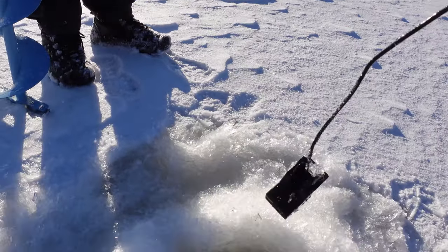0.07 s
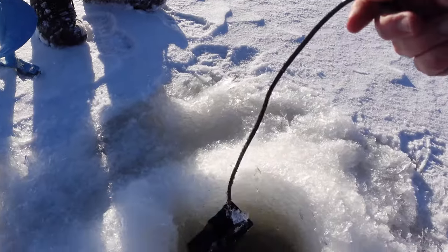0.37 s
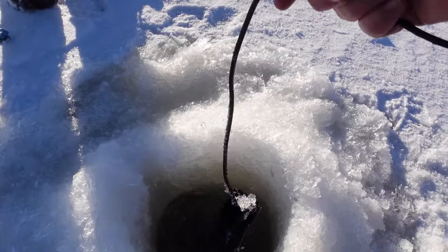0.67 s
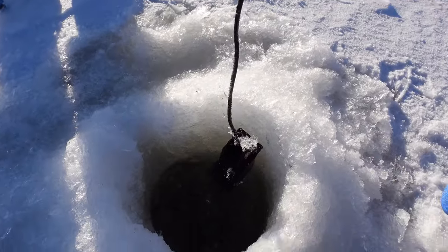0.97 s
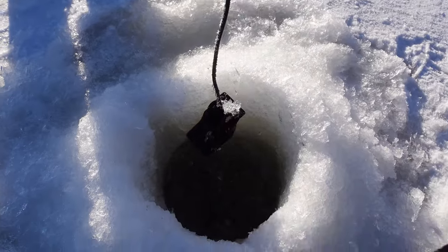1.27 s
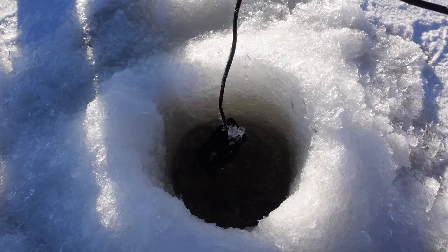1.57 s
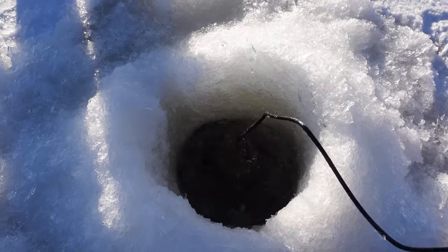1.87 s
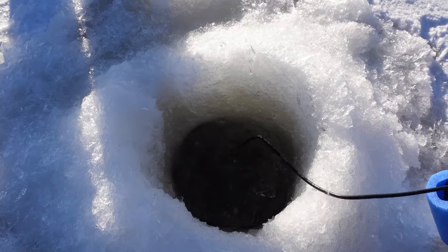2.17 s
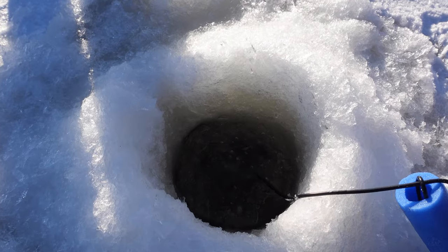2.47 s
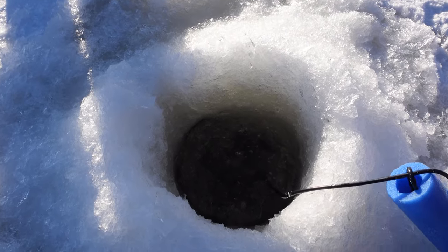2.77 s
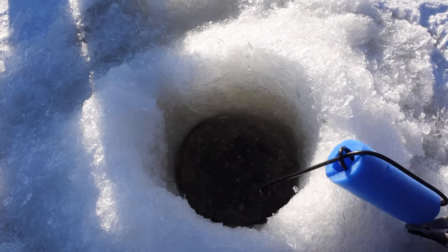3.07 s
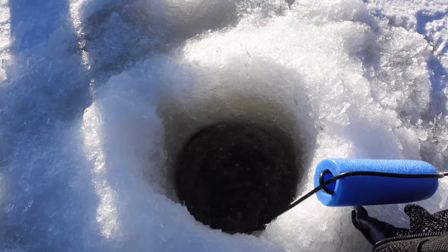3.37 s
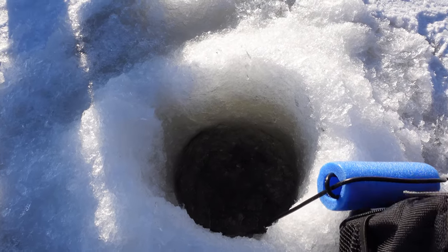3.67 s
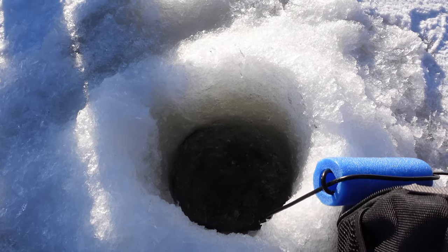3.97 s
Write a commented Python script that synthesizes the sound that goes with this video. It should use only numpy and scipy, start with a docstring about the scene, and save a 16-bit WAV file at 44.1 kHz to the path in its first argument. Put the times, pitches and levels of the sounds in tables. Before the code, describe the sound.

A brief splash with gurgling bubbles sounds as a device on a cable falls through a hole in lake ice. Soft handling comes before it; close snow crackles and jacket rustling follow, while light wind rumbles on the microphone.

```python
"""Device dropped into an ice hole

A small device on a cable is lowered into a hole in lake ice and dropped: it breaks the slush,
splashes and gulps air, which rings as bubbles. The cable rubs over the snowy rim, then winter
clothing and a foam float rustle and knock close by. Light wind buffets the microphone.
The open snowfield gives no echo; only the hole rings."""
import sys
import numpy as np
from scipy import signal
from scipy.fft import rfft, irfft
from scipy.io import wavfile
from scipy.ndimage import uniform_filter1d

SR = 44100
rng = np.random.default_rng(int(sys.argv[2]) if len(sys.argv) > 2 else 0)


def transcribe(u):
    """Save the signal u as a 16-bit wav file named by the first command-line argument.

    u: samples, shape (n,) or (channels, n), limited to [-1, 1]; the rate is SR.
    q: integer samples, one column per channel.
    """
    v = np.clip(np.atleast_2d(u).T, -1, 1)
    q = np.round(v * 32767).astype(np.int16)
    wavfile.write(sys.argv[1], SR, q)


N = 176400
T, HZ = np.arange(N) / SR, np.fft.rfftfreq(N, 1 / SR)

# Spray envelope (time [s], level [dB])
SPRAY_LEVELS = [(1.63,-51),(1.651,-23.5),(1.699,-31.5),(1.721,-15.5),(1.75,-25.5),(1.8,-17.5),(1.839,-20),(1.869,-41.5),(2.042,-47)]
# Gulped air (time [s], first pitch [Hz], last pitch [Hz], peak [dB], swell [s], decay [s])
AIR_BUBBLES = [(1.723,2890,2250,-20.5,0.0074,0.0092),(1.7451,657,940,-4.5,0.00066,0.0019),(1.7461,1520,2010,-2,0.001,0.0016),(1.753,512,668,-12,0.0027,0.0091),(1.755,1905,1703,-14,0.0014,0.0203),(1.79,4190,4320,-11.5,0.0013,0.0052),(1.789,1683,1707,-10.5,0.0023,0.017),(1.809,1960,1712,-7,0.0011,0.0096),(1.836,990,1160,-4.5,0.00084,0.0015),(1.8395,604,910,-11,0.0011,0.0059),(1.85,471,550,-11.5,0.0049,0.006),(1.854,1630,2310,-12.5,0.0016,0.0071),(1.8646,1135,1380,-12,0.00091,0.0066),(1.949,1070,1730,-24.5,0.0016,0.0081),(1.963,1640,1920,-35,.004,0.0135),(2.121,834,2750,-25.5,0.012,0.0021)]
# Small bubbles (start [s], end [s], lowest pitch [Hz], highest pitch [Hz], max peak over spray [dB])
SWARMS = [(1.722,1.844,1363,2700,10),(1.874,1.989,890,2020,11)]
# Drips after the splash (time [s], pitch [Hz], peak [dB])
LATE_DRIPS = [(1.906,5840,-25.5),(1.979,7400,-25),(1.9842,4070,-23.5),(2.1146,7250,-22),(2.2387,6300,-13)]
# Slush, crust and plastic snapping (time [s], level [dB], centre [Hz])
SNAP_HITS = [(1.3451,-25.5,2080),(1.652,-13,7400),(1.665,-14,11000),(1.704,-14,13200),(1.7163,-12,6000),(1.8275,-13,4200),(2.491,-10.5,4800),(2.547,-10.5,6500),(2.5919,-7,2710),(2.596,-16,2770),(2.6269,-8.5,3360),(2.7145,-13,3430),(2.8102,-18.5,3820),(3.2325,-14,3430),(3.468,-20,7300),(3.652,-12.5,1970),(3.753,-21,3800),(3.902,-14.5,2720),(3.951,-16.5,2090)]
# Slush and crust crushed (time [s], level [dB], centre [Hz], decay [s])
CRUNCH_HITS = [(2.086,-27,10000,0.0086),(2.158,-32.5,13500,0.022),(2.547,-16.5,4020,0.0072),(3.119,-18,4900,0.012),(3.148,-16,4180,0.015),(3.301,-23.5,14000,0.0098),(3.376,-21,5940,0.0042),(3.419,-24.5,12000,0.0098),(3.512,-27.5,3020,0.021),(3.637,-15,1170,.012)]
# Device and handling knocks (time [s], level [dB], centre [Hz])
KNOCK_HITS = [(.327,-26,586),(.489,-25,580),(.528,-21,604),(0.8,-28.5,620),(.858,-19.5,665),(1.273,-30.5,780),(1.3203,-17,655),(1.412,-32,667),(2.071,-33.5,222),(3.845,-19.5,705),(3.89,-18,474),(3.951,-20.5,287)]
# Rubbing envelopes (time [s], bass [dB], middle [dB], treble [dB])
SLEEVE_LEVELS = [(0, -32, -27, -32.5), (0.155, -36, -35.5, -42), (0.185, -50, -48, -46.5),
                 (0.31, -48.5, -47, -48.5), (0.36, -40, -46, -42), (0.51, -38.5, -45, -38),
                 (0.6, -29, -32, -30), (0.652, -34, -41, -36), (0.678, -63, -52, -55),
                 (0.77, -56.5, -61, -58), (0.89, -46.5, -46, -48), (0.99, -47, -50.5, -48.5),
                 (1.07, -74, -77, -73), (1.32, -51, -44.5, -46)]
CABLE_LEVELS = [(2.07,-45.5,-49.5,-47),(2.203,-48,-47.5,-41.5),(2.222,-43.5,-26,-27),(2.255,-46.5,-51.5,-46.5),(2.33,-40,-31,-32.5),(2.37,-48,-39,-41.5),(2.43,-42.5,-33.5,-32.5),(2.51,-39.5,-33.5,-38.5),(2.56,-24.5,-22.5,-31.5),(2.67,-34,-34,-35.5),(2.7,-44.5,-48,-49)]
JACKET_LEVELS = [(2.725, -41, -45, -43), (2.76, -29, -37, -40), (2.825, -37, -41.5, -39.5),
                 (2.87, -26, -32, -33.5), (3.03, -27.5, -24, -27), (3.158, -30.5, -26, -25),
                 (3.178, -30.5, -29.5, -30.5), (3.46, -36.5, -37, -36.5), (3.495, -39, -41.5, -40),
                 (3.63, -26.5, -32.5, -33.5), (3.642, -21.5, -27, -27.5), (3.722, -20, -26.5, -32.5),
                 (3.745, -38.5, -41.5, -41), (3.82, -45.5, -48, -47), (3.88, -32, -36.5, -42.5),
                 (4.0, -43, -39.5, -41)]
# Wind buffeting (time [s], level [dB])
BUFFET_LEVELS = [(0,-37),(.28,-33),(1.1,-41.5),(4,-44)]
# Source spectra (frequency [Hz], relative gain [dB])
SPRAY_SPECTRUM = [(150,-37),(550,2.5),(1800,-3),(3200,-2),(5300,2.5),(8400,-2),(10500,-9.5),(15500,-5.5)]
SLEEVE_SPECTRUM = [(80, -17), (306, 1), (508, -1), (640, 6), (936, -4), (5630, -16), (15500, -32.5)]
CABLE_SPECTRUM = [(80, -33), (150, -19.5), (541, -12), (950, -10), (7500, -19), (15500, -29)]
JACKET_SPECTRUM = [(80, -32.5), (362, -9.5), (936, -2.5), (1800, 5), (3400, 4), (7300, -4), (8700, -3.5),
                   (10300, -9.5), (15500, -14)]
AIR_SPECTRUM = [(18,-4),(24,14.5),(34,-1),(85,-16.5),(500,-19),(7000,-28.5),(15500,-33)]

BODY_DECAY_S = 0.0037


def splash():
    """The device hits water: spray, bubbles and drips ring in the hole."""
    water = spray() + sum(swarm(*row) for row in SWARMS)
    for start_s, hz, db in LATE_DRIPS:
        add(water, start_s, bubble(hz, hz, db, swell_s=2 / hz, decay_s=6.1 / hz))
    for start_s, *row in AIR_BUBBLES:
        add(water, start_s, bubble(*row))
    water = signal.lfilter(*signal.butter(2, 300, "high", fs=SR), water)
    return water + hole_echo(water)


def spray(decay_cycles=4.3, fizz_db=-1):
    """Droplets patter back; tiny bubbles ring for a few cycles."""
    t, fizz = T[:1024], np.zeros(N)
    for hz in np.geomspace(1000, 13000, num=24):
        ping = np.exp(-t * hz / decay_cycles) * np.sin(2 * np.pi * hz * rng.uniform(0.89, 1.05) * t)
        fizz += np.sqrt(hz) * unit(signal.oaconvolve(grains(per_s=70, spread_db=4.9), ping)[:N])
    drops = grains(per_s=2500, spread_db=1) + amp(fizz_db) * unit(fizz)
    return envelope(*np.transpose(SPRAY_LEVELS)) * unit(irfft(rfft(drops) * colour(SPRAY_SPECTRUM), N))


def bubble(first_hz, last_hz, db, swell_s, decay_s):
    """Trapped air rings; its pitch glides as it moves and wavers as it deforms."""
    t = T[:4096]
    glide = np.tanh(t / (0.977 * (swell_s + decay_s)))
    wobble = 0.11 * unit(uniform_filter1d(rng.standard_normal(len(t)), size=12))
    pitch_hz = first_hz * (last_hz / first_hz) ** glide * (1 + wobble)
    shape = np.minimum(t / swell_s, 1) * np.exp(-np.maximum(t - swell_s, 0) / decay_s)
    return amp(db) * shape * np.sin(2 * np.pi * np.cumsum(pitch_hz) / SR)


def swarm(start_s, end_s, low_hz, high_hz, over_spray_db, count=20):
    """Small random bubbles chirp upward; their level follows the spray."""
    out = np.zeros(N)
    for k, (jitter, pitch, gain) in enumerate(rng.random((count, 3))):
        at_s = start_s + (end_s - start_s) * (k + jitter) / count
        hz = low_hz * (high_hz / low_hz) ** pitch
        db = over_spray_db + np.interp(at_s, *np.transpose(SPRAY_LEVELS))
        add(out, at_s, gain * bubble(hz, 1.2 * hz, db, swell_s=1 / hz, decay_s=4.6 / hz))
    return out


def hole_echo(water, relative_db=-18.5, t60_s=0.58, top_hz=1830):
    """Short, dull reverberation of the hole."""
    tail = rng.standard_normal(N) * np.exp(-np.log(1000) * T / t60_s)
    response = rfft(tail) / (1 + (HZ / top_hz) ** 2)
    return amp(relative_db) * np.std(water) * unit(irfft(rfft(water) * response, N))


def snap(hz):
    """Brittle break: a sharp crack over a lower body."""
    body = burst(0.32 * hz, q=0.82, decay_s=BODY_DECAY_S)
    return burst(hz, q=2.6, decay_s=0.0013) + amp(-8) * body


def crunch(hz, decay_s):
    """Crust gives way: a fading shower of tiny fractures."""
    fractures = grains(per_s=10000, spread_db=2)[:SR // 5]
    band = signal.iirpeak(hz, Q=0.88, fs=SR)
    shower = signal.lfilter(*band, signal.lfilter(*band, fractures))
    return unit(shower) * np.exp(-T[:len(shower)] / decay_s)


def knock(hz):
    """Dull impact: hollow ring, bright tick, low thud."""
    tick = burst(hz=4950, q=1, decay_s=BODY_DECAY_S)
    thud = burst(hz=237, q=2.6, decay_s=BODY_DECAY_S)
    ring = burst(hz, q=3.5, decay_s=BODY_DECAY_S, cutoff_ratio=1.44)
    return ring + amp(-9) * (tick + thud)


def burst(hz, q, decay_s, cutoff_ratio=4.7):
    """A hard contact and a short crush drive one broad resonance."""
    t = T[:SR // 10]
    force = np.exp(-t / decay_s) * rng.choice([-1., 1.], len(t))
    size = np.linalg.norm(force)
    force[0] = 0.4 * size  # first contact
    ring = signal.lfilter(*signal.iirpeak(hz, q, SR), force)
    cutoff_hz = min(hz * cutoff_ratio, SR / 2.5)
    ring = signal.lfilter(*signal.butter(2, cutoff_hz, fs=SR), ring)
    return ring * size / np.linalg.norm(ring)


def contacts():
    """All snaps, crunches and knocks at their times."""
    out = np.zeros(N)
    for source, hits in (snap, SNAP_HITS), (crunch, CRUNCH_HITS), (knock, KNOCK_HITS):
        for start_s, db, *settings in hits:
            add(out, start_s, amp(db) * source(*settings))
    return out


def rub(levels, spectrum, per_s, spread_db, clump_db, clump_hz):
    """Fibres and snow crystals catch and slip: dense clicks in clumps."""
    times_s, *bands_db = np.transpose(levels)
    clicks = grains(per_s, spread_db) * amp(clump_db * drift(clump_hz))
    slips = rfft(patchy(clicks)) * colour(spectrum)
    bass, below_treble = [1 / (1 + (HZ / edge_hz) ** 8) for edge_hz in (1165, 4400)]
    bands = bass, below_treble - bass, 1 - below_treble
    return sum(envelope(times_s, db) * unit(irfft(slips * band, N)) for db, band in zip(bands_db, bands))


def patchy(x, depth_db=1.92):
    """Wandering colour: random gain patches over time and frequency."""
    spectrogram = signal.stft(x, nperseg=512)[2]
    patches = uniform_filter1d(rng.standard_normal(spectrogram.shape), size=4, axis=0)
    patches = unit(uniform_filter1d(patches, size=3, axis=1))
    return signal.istft(spectrogram * amp(depth_db * patches))[1][:N]


def wind(crossover_hz=59.5, air_db=-51):
    """Deep buffeting at the microphone, plus faint steady air."""
    air = rfft(rng.standard_normal(N)) * colour(AIR_SPECTRUM)
    deep = 1 / (1 + (HZ / crossover_hz) ** 4)
    buffeting = envelope(*np.transpose(BUFFET_LEVELS)) * unit(irfft(air * deep, N))
    return buffeting + amp(air_db) * unit(irfft(air * (1 - deep), N))


def grains(per_s, spread_db):
    """Random clicks of uneven size, rms 1."""
    size = amp(spread_db * np.minimum(rng.exponential(1, N), 4))
    return unit(size * rng.choice([-1., 1.], N) * (rng.random(N) < per_s / SR))


def drift(top_hz):
    """Low-passed noise, rms 1."""
    return unit(irfft(rfft(rng.standard_normal(N)) / (1 + (HZ / top_hz) ** 4), N))


def envelope(times_s, db, fade_s=0.03):
    """Gain along a level curve, fading beyond its ends."""
    beyond_s = np.maximum(times_s[0] - T, 0) + np.maximum(T - times_s[-1], 0)
    return amp(np.interp(T, times_s, db)) * np.exp(-(beyond_s / fade_s) ** 2)


def colour(spectrum):
    """Gain per FFT bin, interpolated over log frequency."""
    hz, db = np.transpose(spectrum)
    return amp(np.interp(np.log(HZ + 1), np.log(hz + 1), db))


def amp(db):
    """Decibels to gain."""
    return 10 ** (np.asarray(db) / 20)


def unit(x):
    """Scale to rms 1."""
    return x / np.sqrt(np.mean(x ** 2) + 1e-20)


def add(mix, start_s, sound):
    """Mix a sound in at start_s."""
    part = mix[max(round(start_s * SR), 0):][:len(sound)]
    part += sound[:len(part)]


def scene():
    """All sources, mono."""
    sleeve = rub(SLEEVE_LEVELS, SLEEVE_SPECTRUM, per_s=18000, spread_db=3, clump_db=2.06, clump_hz=88)
    cable = rub(CABLE_LEVELS, CABLE_SPECTRUM, per_s=7700, spread_db=2, clump_db=3, clump_hz=154)
    jacket = rub(JACKET_LEVELS, JACKET_SPECTRUM, per_s=13000, spread_db=3, clump_db=1.8, clump_hz=115)
    return (splash() + contacts() + sleeve + cable + jacket + wind())[None]


def record(dry):
    """Soft clip, then low-pass."""
    ceiling, cutoff_hz = 0.85, 15850
    clipped = dry / (1 + (dry / ceiling) ** 8) ** (1 / 8)
    lowpass = signal.firwin(511, cutoff_hz, window=("kaiser", 9), fs=SR)
    return signal.oaconvolve(clipped, lowpass[None], "same")


dry = scene()
out = record(dry)
transcribe(out)
```